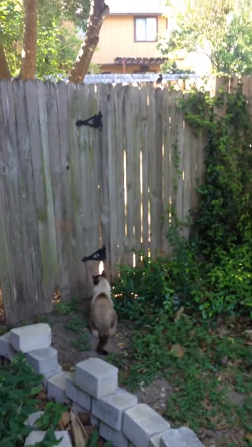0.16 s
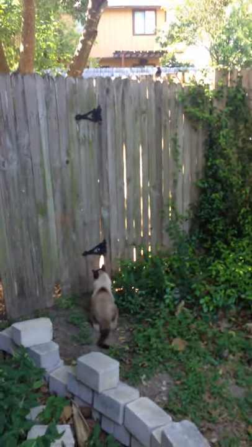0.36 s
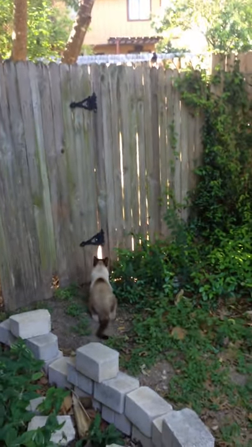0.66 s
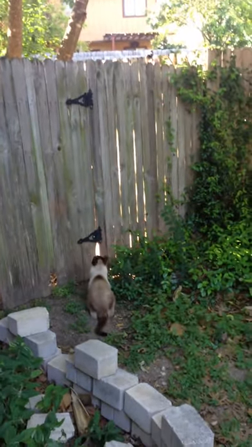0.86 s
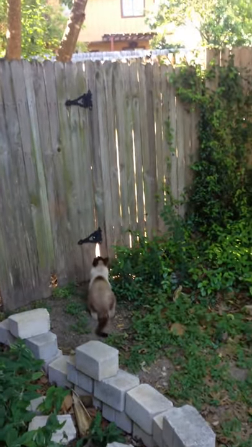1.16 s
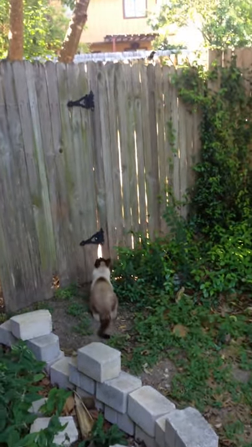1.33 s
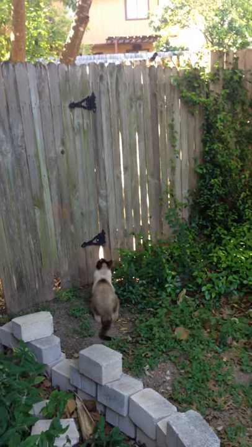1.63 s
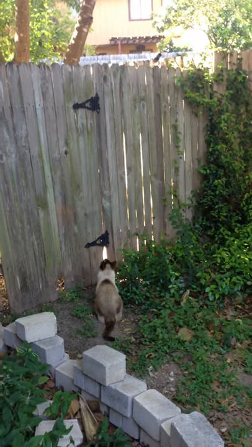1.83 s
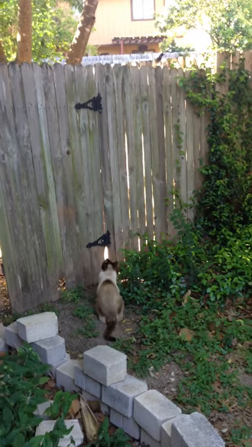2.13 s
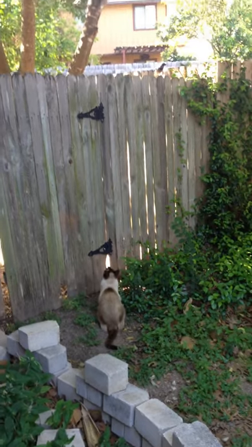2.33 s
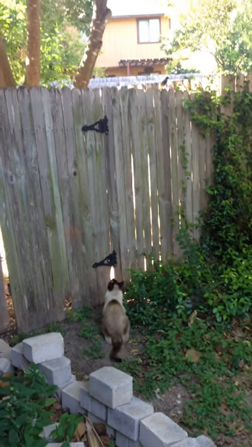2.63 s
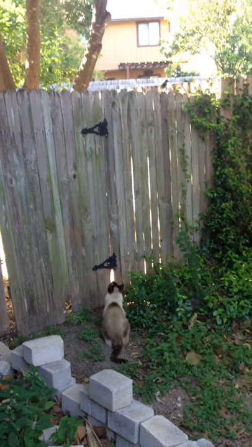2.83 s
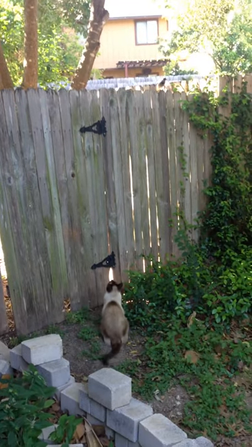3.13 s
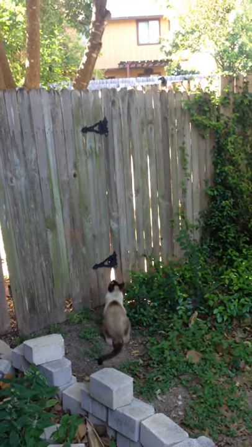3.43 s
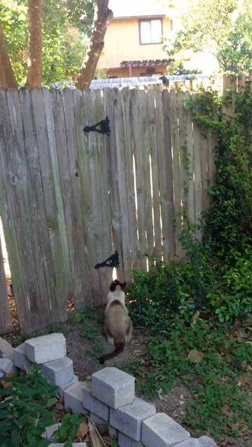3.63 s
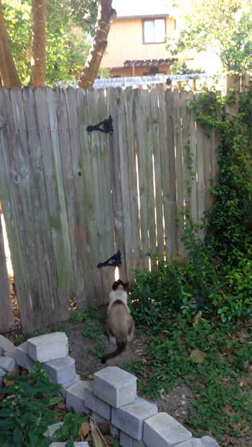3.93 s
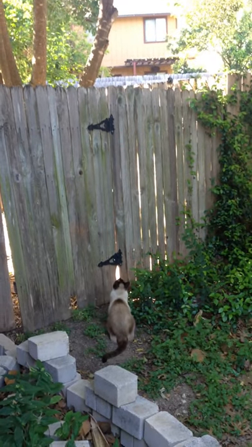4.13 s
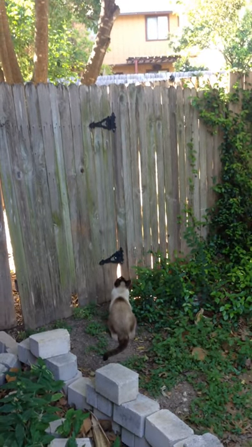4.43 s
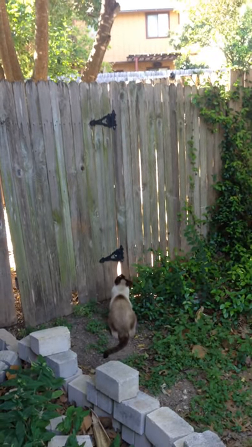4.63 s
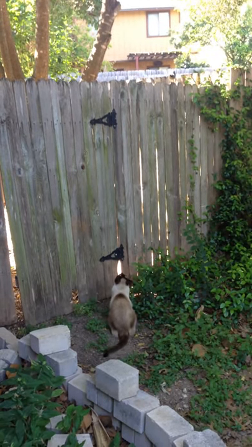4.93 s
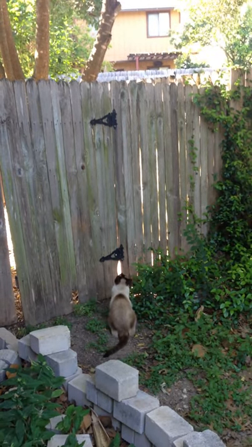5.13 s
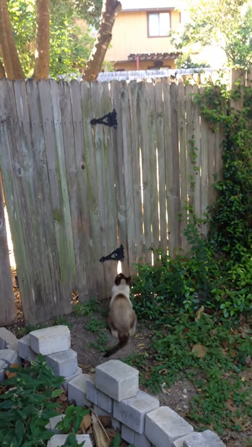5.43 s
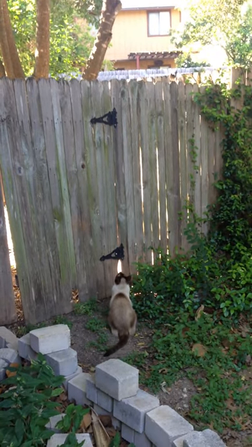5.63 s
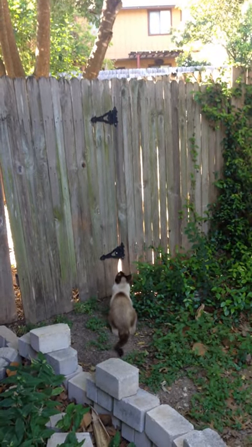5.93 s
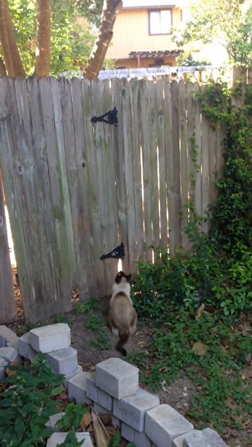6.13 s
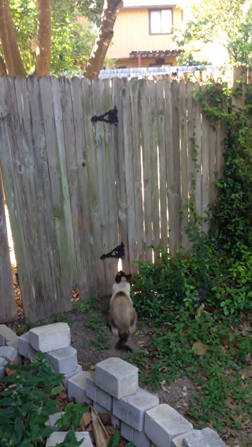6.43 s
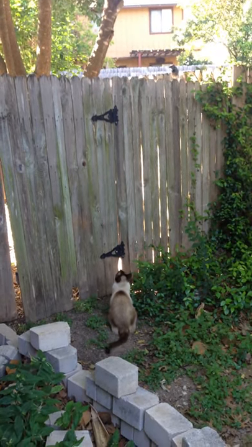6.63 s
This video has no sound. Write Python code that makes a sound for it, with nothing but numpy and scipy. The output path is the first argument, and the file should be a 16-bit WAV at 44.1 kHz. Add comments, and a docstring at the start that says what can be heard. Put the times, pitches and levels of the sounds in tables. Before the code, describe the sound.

Loud raspy jay scolds, two spaced apart then a quick pair, echo off a wooden fence while faint doves and small birds call farther away.

```python
"""Over a low suburban hum with soft hiss (shaped noise), a small songbird twitters: quick arches of pitch.
A blue jay then scolds four times in a fenced backyard: each jeer is a stack of partials on a sagging pitch,
clear and nasal until partials blur and rasp comes in; the third is strained and breaks early.
Distant doves coo between registers, and a farther bird adds buzzy down-slurs (smeared tones).
The fence and ground throw the jay's calls back as echoes; the trees add a short tail of decaying noise."""
import sys
import numpy as np
from scipy import signal
from scipy.fft import rfft, irfft, next_fast_len
from scipy.io import wavfile
from scipy.ndimage import uniform_filter1d

SR = 44100
rng = np.random.default_rng(int(sys.argv[2]) if len(sys.argv) > 2 else 0)


def wrap_up_sound(samples):
    """Save the sound to the file named by the first command line argument, as 16-bit audio."""
    columns = np.atleast_2d(samples).T
    # keep every value between -1 and 1, then stretch to whole-number steps
    tamed = np.clip(columns, -1, 1)
    steps = np.round(tamed * 32767).astype(np.int16)
    wavfile.write(sys.argv[1], SR, steps)


N = 298116


def gain_of(db):
    """Decibels to a gain."""
    return 10 ** (np.asarray(db) / 20)


def evened(x):
    """Scales to rms 1."""
    return x / np.sqrt(np.mean(abs(x) ** 2) + 1e-20)


def read(points, hz):
    """Reads a table on a log-frequency axis."""
    point_hz, value = np.transpose(points)
    return np.interp(np.log(hz + 1), np.log(point_hz + 1), value)


def add(mix, start_s, sound):
    """Mixes a sound in at start_s."""
    part = mix[max(round(start_s * SR), 0):][:len(sound)]
    part += sound[:len(part)]


def colour(x, points):
    """Filters by a spectrum table (Hz, dB)."""
    size = next_fast_len(len(x) + 1024)
    gain = gain_of(read(points, np.fft.rfftfreq(size, 1 / SR)))
    return irfft(rfft(x, size) * gain, size)[:len(x)]


def wobble(count, corner_hz):
    """Smooth random curve, rms 1 over its period, rolling off above corner_hz."""
    size = 32768  # period in samples
    hz = np.fft.rfftfreq(size, 1 / SR)[:800]
    spectrum = rng.standard_normal(len(hz)) + 1j * rng.standard_normal(len(hz))
    spectrum /= np.sqrt(1 + (hz / corner_hz) ** 4)
    return np.resize(evened(irfft(spectrum, size)), count)


def hoarse_tone(hz, hoarse, smear_hz):
    """Nearly pure tone; hoarseness (0-1) smears its power into a narrow band."""
    count = len(hz)
    smear = evened(wobble(count, smear_hz) + 1j * wobble(count, smear_hz))
    envelope = np.sqrt(1 - hoarse) + np.sqrt(hoarse) * smear
    return np.sqrt(2) * (envelope * np.exp(2j * np.pi * np.cumsum(hz) / SR)).real


def air(whirr_hz=1790, whirr_width_hz=60, whirr_db=-77, hiss_db=-60, hum_db=-57):
    """Far traffic and soft hiss as shaped noise, with a faint whirr from a narrow resonance."""
    # relative spectra: freq_hz, density_db (per Hz)
    hiss_spectrum = [(250, -35), (420, -6.5), (511, 1.5), (603, 2.5), (1440, -8.5), (1750, -4), (1920, -8),
                     (3610, -6), (14600, -14.5), (15300, -18)]
    hum_spectrum = [(15, -44), (25, -21.5), (59, -4), (161, 0.5), (260, -11.5), (303, -9), (440, -18.5),
                    (570, -62), (970, -120)]
    hiss = gain_of(hiss_db) * evened(colour(rng.standard_normal(N), hiss_spectrum))
    hum = gain_of(hum_db) * evened(colour(rng.standard_normal(N), hum_spectrum))
    hz = np.fft.rfftfreq(N, 1 / SR)
    resonance = 1 / (1 + ((hz - whirr_hz) / whirr_width_hz) ** 2)
    whirr = irfft(rfft(rng.standard_normal(N)) * resonance, N)
    return hiss + hum + gain_of(whirr_db) * evened(whirr)


def songbirds(phrase_db=-1.0, phrase_tail_db=-11.0, slur_db=0.5, slur_tail_db=-5):
    """One quick phrase sung three times, and a farther bird's buzzy down-slurs with a longer tail."""
    # notes, levels before the trims above; phrase times count from its start:
    # start_s, end_s, first_hz, middle_hz, last_hz, level_db, hoarseness (0-1)
    phrase_notes = [(0, 0.046, 3400, 4820, 3100, -60, .05), (0.035, 0.062, 5610, 4500, 2866, -60, .08),
                    (0.067, 0.099, 3300, 5020, 3110, -60, .1), (.1, 0.138, 2866, 3720, 2600, -56.5, 0.01)]
    slur_notes = [(2.966, 3.08, 4300, 3560, 3320, -58.5, 0.8), (4.623, 4.734, 4190, 3560, 3190, -57.5, 0.8),
                  (6.669, 6.77, 3530, 3150, 2960, -64.5, 0.8)]
    # phrase onsets: start_s
    phrase_starts = [.424, 3.286, 5.331]
    phrases, slurs = np.zeros((2, N))
    for start_s in phrase_starts:
        for row in phrase_notes:
            offset_s, sound = note(row, smear_hz=199.5, fade=0.26)
            add(phrases, start_s + offset_s, sound)
    for row in slur_notes:
        add(slurs, *note(row, smear_hz=260, fade=0.36))
    phrases = phrases + gain_of(phrase_tail_db) * scatter(phrases, stretch=0.53)
    slur_tail = gain_of(slur_tail_db) * scatter(slurs, stretch=1.6)
    return gain_of(phrase_db) * phrases + gain_of(slur_db) * slurs + slur_tail


def note(row, smear_hz, fade):
    """Nearly pure tone on a parabolic arch of pitch; fade is the tapered share of its length."""
    start_s, end_s, first_hz, middle_hz, last_hz, level_db, hoarse = row
    u = np.linspace(0, 1, max(round((end_s - start_s) * SR), 64))
    hz = np.polyval(np.polyfit([0, .5, 1], [first_hz, middle_hz, last_hz], 2), u)
    tone = hoarse_tone(hz, hoarse, smear_hz)
    return start_s, gain_of(level_db) * tone * signal.windows.tukey(len(u), fade)


def jay():
    """Four jeers, each with its own pitch sag, ringing and breaking; the third uses the strained voice."""
    # jeers: start_s, length_s, top_hz, sag_hz, sag_power, clear_s, onset_db, overtones_db, rasp_db,
    # least_roughness (0-1), harshness (scales a tilt), treble_db (9.5 kHz up), notch_db; levels relative
    jeers = [ (.948, 0.39, 802.2, 95.6, 2.37, .195, -1.5, -23, -34, 0.21, -0.7, 0.5, -17.5),
             (1.587, .38, 801.2, 103.8, 3.14, .2, -8, -25, -34.5, 0.2, -2, -.5, -22),
             (3.4, .34, 804, 116.4, 1.7, 0.044, 3.5, -28, -34, 0.24, 2, -2.5, 1.5),
             (3.825, .41, 793.8, 80.2, 2.8, .21, 1.5, -24, -35.5, 0.12, -0.1, 0.5, -13.5), ]
    # ringing fourth partial through each jeer, before trim: scene_time_s, level_db
    ringing = [
        [(0.95, -35.5), (0.96, -29.5), (1.0, -22), (1.076, -19.5), (1.17, -23.5), (1.182, -18), (1.254, -28.5),
         (1.314, -26), (1.333, -33.5)],
        [(1.589, -41), (1.609, -29.5), (1.629, -39), (1.645, -23.5), (1.785, -26.5), (1.815, -21.5),
         (1.911, -33), (1.939, -27), (1.971, -35)],
        [(3.401, -44), (3.413, -27.5), (3.427, -18.5), (3.513, -15.5), (3.531, -26), (3.637, -24), (3.655, -36),
         (3.667, -26), (3.734, -30.5)],
        [(3.826, -43.5), (3.842, -26.5), (3.858, -22.5), (4.014, -22.5), (4.04, -17), (4.058, -27.5),
         (4.07, -22.5), (4.222, -32), (4.232, -24.5)],
    ]
    # partials, relative: multiple_of_pitch, level_db
    clear_voice = [(1, -40.5), (2, -19.5), (3, -14.5), (4, 3), (5, -18), (6, -16), (7, -14), (8, -2),
                   (9, -11), (10, -12), (11, -16.5), (12, -17), (13, -20), (14, -20), (15, -26.5),
                   (16, -24), (17, -25.5), (18, -39.5), (19, -54.5)]
    strained_voice = [(1, -42), (2, -23.5), (3, -22), (4, 0), (5, -22), (6, -22.5), (7, -41), (8, -18),
                      (9, -23), (10, -17.5), (11, -39), (12, -34), (13, -45), (14, -36.5), (15, -30.5),
                      (16, -37), (17, -47.5), (18, -46.5)]
    voices = [clear_voice, clear_voice, strained_voice, clear_voice]
    out = np.zeros(N)
    for row, ring, levels in zip(jeers, ringing, voices):
        add(out, *jeer(row, ring, levels))
    return out


def jeer(row, ring, levels, ring_db=-0.44, ring_rough_db=-1.5, scoop=0.23, scoop_s=0.008,
         jitter=.007, side_db=-24.0, rasp_trim_db=4, burst_db=-34.0):
    """The syrinx bursts, scoops up to a clear stack of partials, then vibrates more chaotically."""
    (start_s, length_s, top_hz, sag_hz, sag_power, clear_s, onset_db, over_db, rasp_db,
     rough_least, harshness, treble_db, notch_db) = row
    break_s, rasp_rise_s, rasp_end_db = 0.13, 0.052, -1.5  # rasp comes in faster than the blur
    push_peak, push_start_db, push_end_db = 0.37, -16, -20.5  # arch of effort; peak as share of the call
    waver, waver_hz = 0.0036, 28  # pitch waver of the broken voice (share)
    grain_db, grain_hz = 0.22, 75  # uneven level of the broken voice
    age = np.arange(0, length_s, 1 / SR)
    count, u = len(age), age / length_s

    starting = np.exp(-(age / 0.024) ** 2)  # the first cycles are unsettled
    broken = np.clip((age - clear_s) / break_s, rough_least, 1)
    grit = np.clip((age - clear_s) / rasp_rise_s, rough_least, 1)
    rough = np.maximum(broken, starting)

    hz = top_hz - sag_hz * u ** sag_power
    hz *= 1 - scoop * np.exp(-(age / scoop_s) ** 2)
    hz *= 1 + waver * broken * wobble(count, waver_hz)
    # period jitter blurs the high partials most
    slow_jitter = .0012 * wobble(count, 65)
    fast_jitter = (0.0033 + jitter * rough) * wobble(count, 260)
    turns = np.cumsum(hz * (1 + slow_jitter + fast_jitter)) / SR

    main_db = np.interp(start_s + age, *np.transpose(ring)) + ring_db + ring_rough_db * broken
    rising = np.maximum(1 - u / push_peak, 0)
    falling = np.maximum((u - push_peak) / (1 - push_peak), 0)
    bright_db = over_db + (push_start_db + onset_db) * rising ** 2 + push_end_db * falling ** 2
    # the fourth partial sits on the throat's resonance; its neighbours follow the overall effort
    effort_db = uniform_filter1d(np.maximum(main_db, bright_db), size=2600)
    neighbour_db = 0.69 * effort_db + side_db + 5.8 * broken - 6.2 * starting

    stack = partials(levels, turns, rough)
    order = np.transpose(levels)[0]
    fourth, upper = order == 4, order > 6
    voice = gain_of(main_db) * evened(stack[fourth].sum(0))
    voice += gain_of(neighbour_db) * evened(stack[~fourth & ~upper].sum(0))
    voice += gain_of(bright_db - 2.5 * rough) * evened(stack[upper].sum(0))
    burst = gain_of(burst_db + onset_db) * np.exp(-age / .014)
    rasp_gain = gain_of(rasp_db + rasp_trim_db + rasp_end_db * falling ** 2) * grit
    voice += (rasp_gain + burst) * rasp(turns)
    voice *= gain_of(grain_db * broken * wobble(count, grain_hz))

    # second partial slides through 1535 Hz, sixth through 4653 Hz
    notch = [(1535 - 24, 0), (1535, notch_db), (1535 + 24, 0)]
    peak = [(4653 - 110, 0), (4653, 5.5), (4653 + 110, 0)]
    # positive harshness: thinner below the resonance, denser just above it
    tilt = [(2450, -2 * harshness), (2800, 0.0078), (3250, 0), (3700, 0.57 * harshness)]
    voice = colour(voice, notch + tilt + peak + [(8300, 0.0065), (9500, treble_db)])
    return start_s, voice * np.clip(age / .001, 0, 1) * np.clip((length_s - age) / .008, 0, 1)


def partials(levels, turns, rough, flutter=0.53, beat=0.069, drift_db=2):
    """Stack of partials, one row each; roughness makes each flutter on its own."""
    count = len(turns)
    # a swell every four cycles puts faint sidebands on each partial
    sway = 1 + beat * np.cos(2 * np.pi * turns / 4) * (1 + .5 * wobble(count, 30.14))
    stack = []
    for k, level_db in levels:
        drift = drift_db * (k != 4) * wobble(count, 7)  # partials off the resonance come and go
        wave = np.cos(2 * np.pi * (k * turns + rng.random()))
        swell = sway + flutter * rough * wobble(count, 135.8)
        stack.append(gain_of(level_db + drift) * wave * swell)
    return np.array(stack)


def rasp(turns, smear_hz=125, puff_db=-1.0):
    """Chaotic vibration: every partial smeared into a band, plus one puff of air a cycle."""
    # relative rasp spectrum: freq_hz, density_db (per Hz)
    rasp_spectrum = [(900, -50.5), (1350, -28), (1900, -34), (2300, 4.5), (2900, -2.5), (3800, 7),
                     (4400, 0.5), (5000, -2), (6000, 2), (7000, -3.5), (8500, -6), (10500, -16.5),
                     (13000, -13.5), (15500, -35)]
    count = len(turns)
    bands = np.zeros(count)
    for k in range(1, 22):
        smear = wobble(count, smear_hz) + 1j * wobble(count, smear_hz)
        bands += (smear * np.exp(2j * np.pi * k * turns)).real
    puffs = (1 + 1.1 * np.cos(2 * np.pi * turns)) * rng.standard_normal(count)
    mixed = evened(bands) + gain_of(puff_db) * evened(puffs)
    return evened(colour(mixed * (1 + .3 * wobble(count, 290)), rasp_spectrum))


def doves(trim_db=0.18):
    """Several doves whose coos overlap."""
    # coos, levels before trim: start_s, lead_in_s, high_note_s, drop_s, top_hz, sag_hz,
    # lead_in_db, high_start_db, high_end_db, drop_db
    coos = [ (2.255, .125, 0.019, .02, 744, 25, -50, -46, -57.5, -59),
            (2.562, 0.032, .24, 0.091, 738, 92, -44, -43, -56.5, -47.5),
            (3.42, 0.04, 0.069, 0.065, 744, 61, -45, -45.5, -49.5, -61),
            (3.735, 0.046, .185, 0.083, 695, 46, -46, -69, -41, -43),
            (3.98, 0.028, .305, .15, 756, 105, -49, -64, -42.5, -76),
            (4.28, 0.096, 0.087, 0.21, 675, 15, -46.5, -55, -46.5, -57),
            (4.635, 0.035, 0.086, 0.078, 666, 49, -47.5, -52.5, -45, -56.5),
            (4.78, 0.033, 0.15, .03, 738, 70, -50, -56.5, -56, -66),
            (5.025, 0.042, .06, .14, 699, 50, -60, -55.5, -53, -48.5),
            (5.24, 0.046, 0.45, .15, 689, 69, -47, -57.5, -55, -45.5),
            (5.52, 0.0433, 0.0731, .02, 664.6, 8, -53.5, -41, -45.5, -65),
            (5.72, 0.037, 0.19, 0.038, 716, 55, -50.5, -72, -55.5, -63),
            (6.13, 0.093, 0.096, .15, 660, 18.7, -45, -52.5, -48, -54.5),
            (6.32, 0.032, 0.65, .03, 738, 93, -45.5, -62, -54.5, -60),
            (6.47, .045, 0.11, .06, 650, 26, -45.5, -50.5, -49.5, -60.5), ]
    out = np.zeros(N)
    for row in coos:
        add(out, *coo(row))
    return gain_of(trim_db) * out


def coo(row, sag_power=1.6, hoarse_low=0.172, hoarse_high=.1, smear_hz=38):
    """Nearly pure tone that jumps from a hoarse low register to a clearer, sagging high one and back."""
    start_s, lead_s, hold_s, drop_s, top_hz, sag_hz, lead_db, first_db, last_db, drop_db = row
    lead_hz, lead_rise_hz = 558, 44  # the low register rises into the jump
    low_hz, low_sag_hz, low_fade_db = 590, 60, -13.5  # and sinks and fades after the high note
    jump_s, edge_s = .018, .026  # register change; onset and release
    t = np.arange(0, lead_s + hold_s + drop_s, 1 / SR)
    rise = np.clip(t / lead_s, 0, 1)
    held = np.clip((t - lead_s) / hold_s, 0, 1)
    sunk = np.clip((t - lead_s - hold_s) / drop_s, 0, 1)

    def registers(lead, high, drop):
        """Joins lead-in, high note and drop, smoothed over the jump."""
        return uniform_filter1d(np.select([rise < 1, held < 1], [lead, high], drop), size=round(jump_s * SR))

    hz = registers(lead_hz + lead_rise_hz * rise, top_hz - sag_hz * held ** sag_power,
                   low_hz - low_sag_hz * sunk)
    level_db = registers(lead_db, first_db + (last_db - first_db) * held,
                         drop_db + low_fade_db * sunk ** 2)
    hoarse = np.clip(registers(hoarse_low, hoarse_high, hoarse_low), 0, 1)
    edges = np.minimum(np.minimum(t, t[-1] - t) / edge_s, 1)
    return start_s, gain_of(level_db) * hoarse_tone(hz, hoarse, smear_hz) * edges


def reflections(x):
    """The sound with its first echoes from the ground, the fence and the house."""
    # echoes: delay_s, level_db
    echoes = [(.0023, -31.5), (.0071, -17), (0.0137, -14), (0.0207, -33), (.036, -14.5)]
    out = x.copy()
    for delay_s, level_db in echoes:
        add(out, delay_s, gain_of(level_db) * x)
    return out


def scatter(x, stretch):
    """Diffuse tail from leaves and walls, the top treble dying first; stretch scales its length."""
    # decay at stretch 1: freq_hz, t60_s
    decay = [(500, 0.72), (3000, 0.62), (6000, 0.67), (14000, 0.073)]
    hz, t, z = signal.stft(rng.standard_normal(SR), SR, nperseg=256)
    t60_s = stretch * read(decay, hz)[:, None]
    tail = signal.istft(z * gain_of(-60 * t / t60_s), SR, nperseg=256)[1]
    tail *= np.clip(np.arange(len(tail)) / SR / 0.005, 0, 1)  # 5 ms fade-in
    return signal.fftconvolve(x, tail / np.linalg.norm(tail))[:N]


def scene():
    """The jay is near and fairly dry; the other birds are farther and wetter."""
    background, small_birds, near, coos = air(), songbirds(), jay(), doves()
    early = gain_of(-12.5) * scatter(near, stretch=.42)
    late = gain_of(-28.0) * scatter(near, stretch=1.6)
    close = reflections(near) + early + late
    far = coos + gain_of(-11.0) * scatter(coos, stretch=0.79) + small_birds
    return (gain_of(0.48) * close + far + background)[None]


def record(dry):
    """The recorder's band limit: a linear-phase low-pass."""
    edge_hz = 15480
    lowpass = signal.firwin(511, edge_hz, window=("kaiser", 9), fs=SR)
    return signal.oaconvolve(dry, lowpass[None], "same")


dry = scene()
out = record(dry)
wrap_up_sound(out)
```